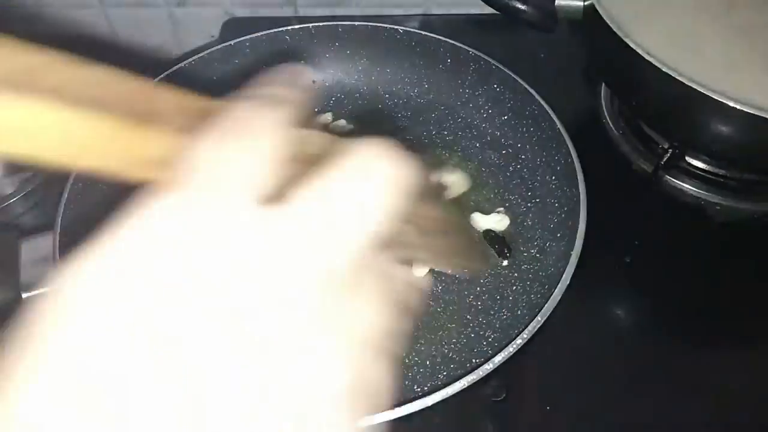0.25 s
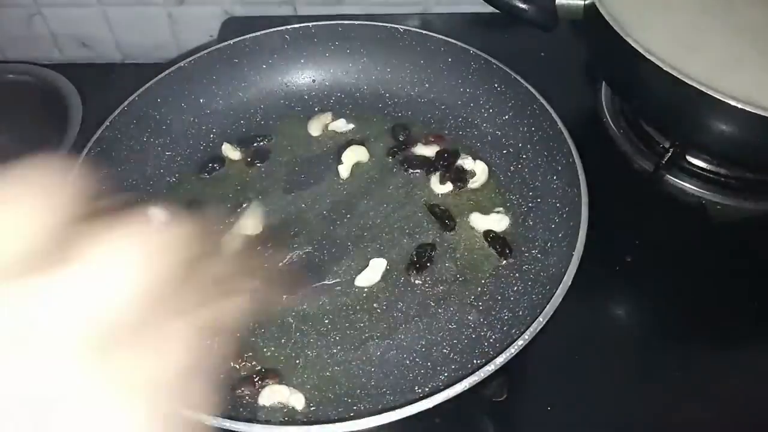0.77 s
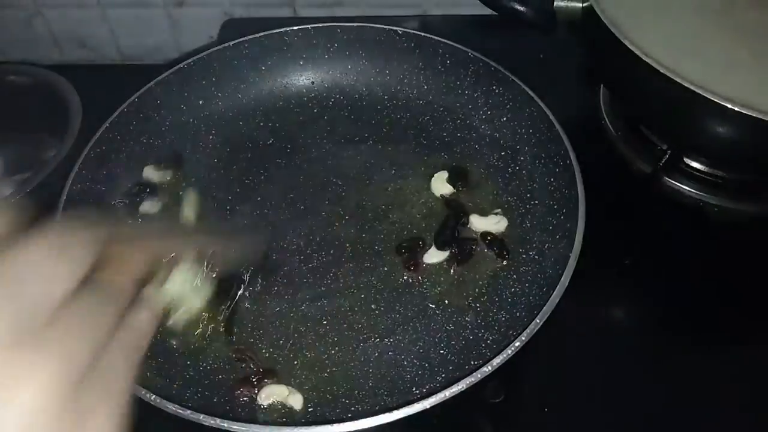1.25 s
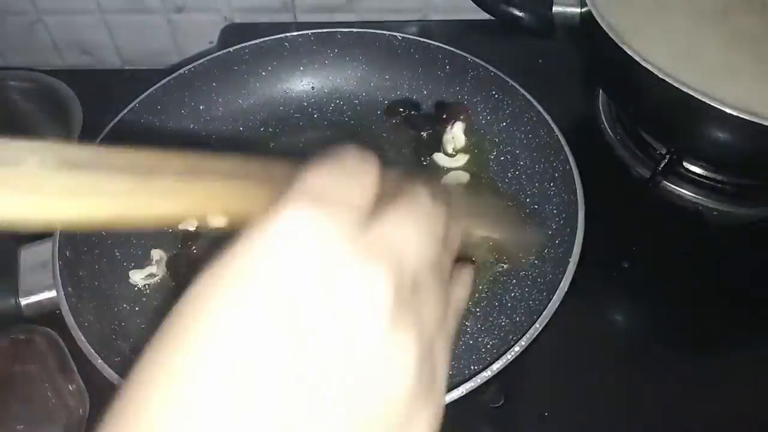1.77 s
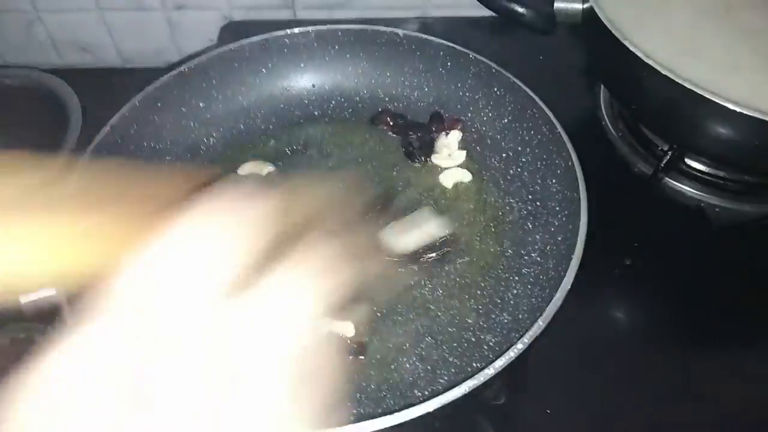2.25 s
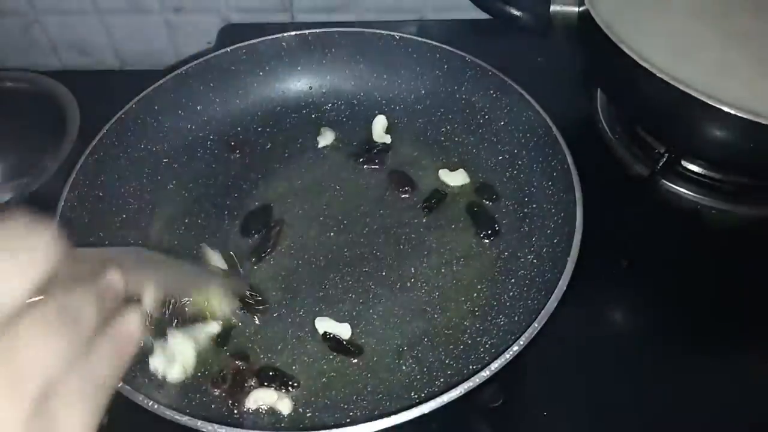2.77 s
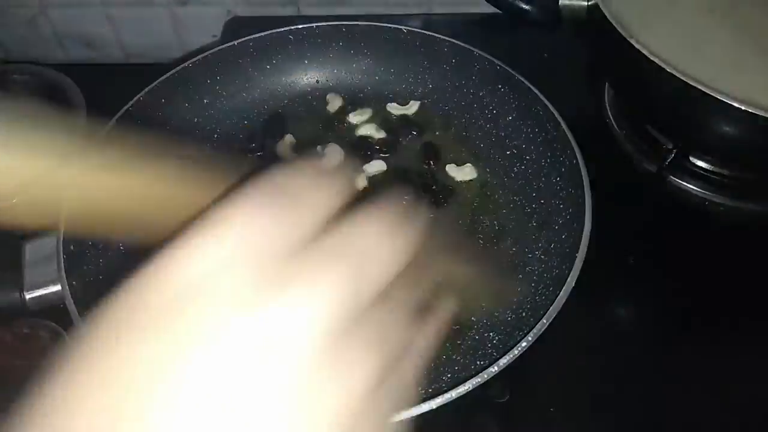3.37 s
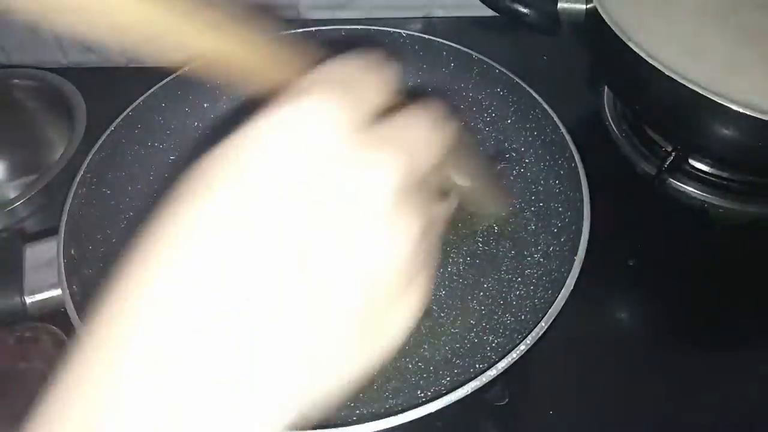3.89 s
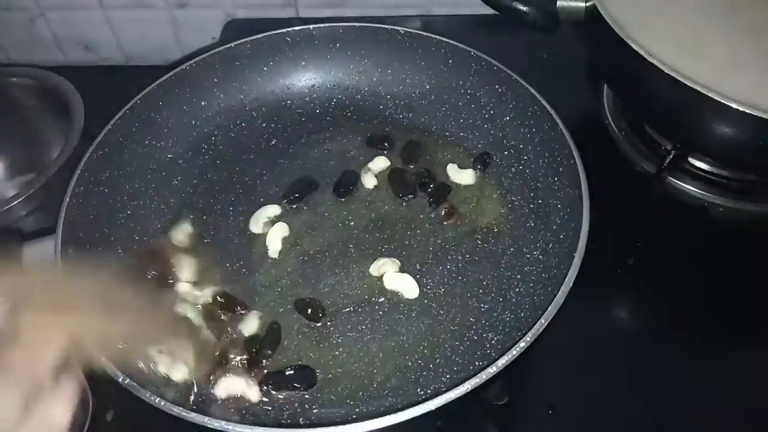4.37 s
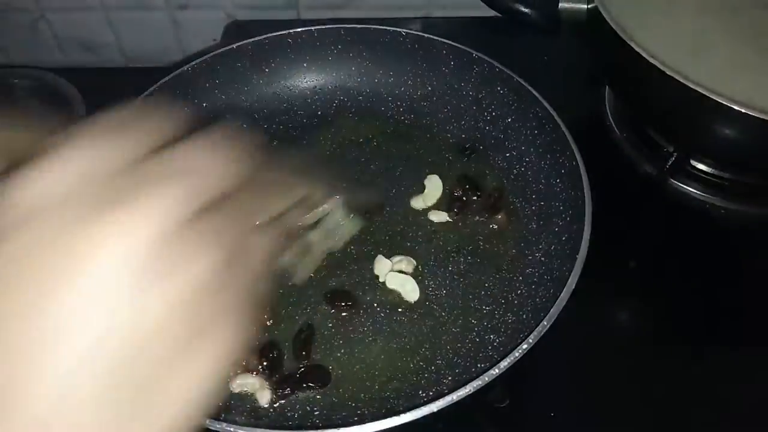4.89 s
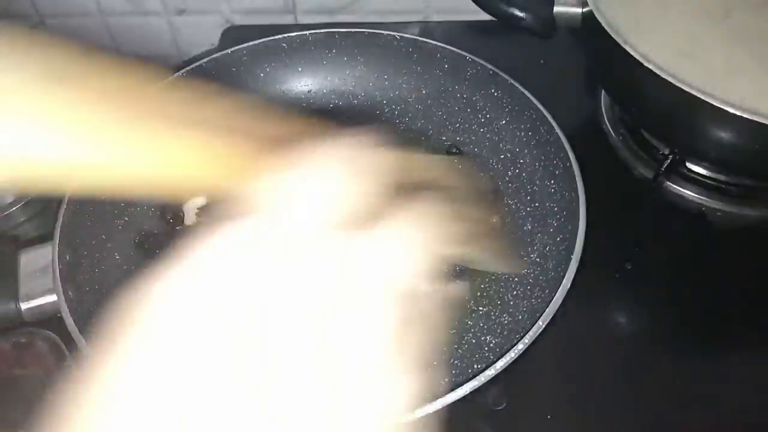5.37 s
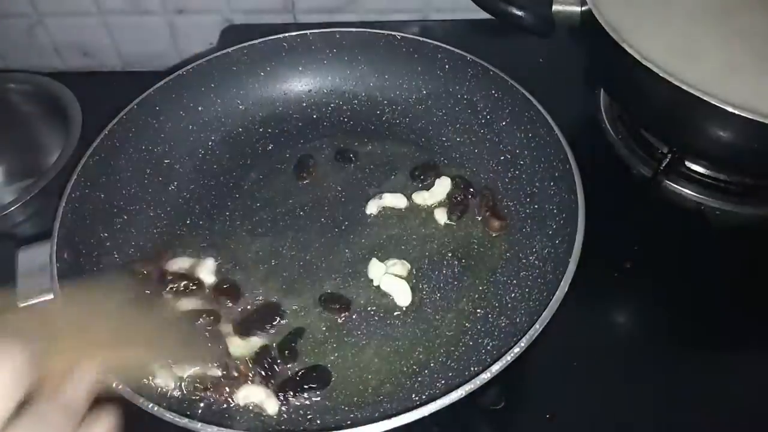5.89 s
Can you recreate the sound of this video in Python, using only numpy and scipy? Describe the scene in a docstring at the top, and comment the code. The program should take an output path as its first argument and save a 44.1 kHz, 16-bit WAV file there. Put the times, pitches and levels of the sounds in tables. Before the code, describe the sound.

A steady, bright sizzle of fine bubbles sits over a soft low rush and faint hum. Wood lands on the pan repeatedly, dull and hollow, then drags and rasps across the coating as nuts clatter lightly. Fat spits crackle most around two seconds, with another strong snap past four and a half. Close microphone, short kitchen reflections, same sound in both channels.

```python
"""Nuts sizzling in ghee

Cashews and raisins sizzle in a little hot ghee, close by in a small kitchen: noise and swarms of tiny
ringing bubbles, over a low simmer. A wooden spatula knocks on the pan at uneven intervals, ticks and
scrapes the nuts round, and sets the pan's dying vibrations ringing. Fat spits in short snaps and high
pings, and a few dull rumbles lie under the stirring. Both channels are alike."""
import sys
import numpy as np
from scipy import signal
from scipy.io import wavfile

SR = 44100
rng = np.random.default_rng(int(sys.argv[2]) if len(sys.argv) > 2 else 0)


def generate_wav(sig):
    """Save sig (samples, or channels by samples) to the path in sys.argv[1] as 16-bit PCM at SR."""
    pcm = np.round(np.clip(np.atleast_2d(sig).T, -1, 1) * 32767).astype(np.int16)
    wavfile.write(sys.argv[1], SR, pcm)


N = 270774
TIME = np.arange(N) / SR
RING_TIME = TIME[:SR]  # one second, enough for any ring to die away


def amp(db):
    """Turns decibels into a gain."""
    return 10 ** (np.asarray(db) / 20)


def evened(x):
    """Scales a sound to an average strength (rms) of 1."""
    return x / np.sqrt(np.mean(x ** 2) + 1e-20)


def read(points, hz):
    """Reads a (f/Hz, value) table, joining its points along a log-frequency axis."""
    f, value = np.transpose(points)
    return np.interp(np.log(hz + 1), np.log(f), value)


def add(mix, start_s, sound):
    """Mixes a sound in from the given time."""
    part = mix[max(round(start_s * SR), 0):][:len(sound)]
    part += sound[:len(part)]


def convolve(x, response):
    """Filters x and keeps its length."""
    return signal.fftconvolve(x, response)[:len(x)]


def colour(x, spectrum, size=4096):
    """Filters with the given spectrum, with no sound ahead of a click, so its front stays sharp."""
    hz = abs(np.fft.fftfreq(size, 1 / SR))
    log_gain = np.log(amp(read(spectrum, hz)))
    minimum_phase = np.exp(np.conj(signal.hilbert(log_gain)))
    response = np.fft.ifft(minimum_phase).real[:size // 2]
    return convolve(x, response)


def clicks(count, per_s, spread_db):
    """Makes a random train of clicks, most small and a few large."""
    sizes = amp(spread_db * np.minimum(rng.exponential(1, count), 6))
    signs = rng.choice([-1, 1], count)
    happens = rng.random(count) < per_s / SR
    return evened(sizes * signs * happens)


def flutter(count, per_s, depth_db):
    """Makes a gain that wanders at random, heading for per_s new levels each second."""
    steps = np.arange(count) * per_s / SR
    return amp(depth_db * np.interp(steps, np.arange(4096), rng.standard_normal(4096)))


def bump(length_s):
    """Makes a smooth push that rises and falls, length_s long at half height."""
    return signal.windows.hann(round(2 * length_s * SR))


def swell(rise_s, t60_s):
    """Makes an envelope that builds up, then dies away by 60 dB in t60_s."""
    return (1 - np.exp(-RING_TIME / rise_s)) * np.exp(-np.log(1000) * RING_TIME / t60_s)


def mode(hz, rise_s, t60_s):
    """Makes one dying vibration: a sine under a swell."""
    return swell(rise_s, t60_s) * np.sin(2 * np.pi * hz * RING_TIME)


def soften(x, hz):
    """Dulls a blow: a soft contact passes little above its corner frequency."""
    return signal.lfilter(*signal.butter(2, min(hz, SR / 4), fs=SR), x)


# how long the room's echo takes to die by 60 dB: (f/Hz, t60/s)
ROOM_ECHO = [(200, 0.56), (1000, 0.47), (4000, 0.085), (12000, 0.029)]


def kitchen(x, wet_db):
    """Adds the tiled room: dense reflections, the treble dying first."""
    hz, t, cells = signal.stft(rng.standard_normal(SR // 2), SR, nperseg=256)
    fade = amp(-60 * t / read(ROOM_ECHO, hz)[:, None])
    tail = signal.istft(cells * fade, SR, nperseg=256)[1]
    tail[:round(.005 * SR)] = 0  # the first reflections arrive after 5 ms
    return x + amp(wet_db) * convolve(x, tail / np.linalg.norm(tail))


# the spatula turns moist nuts onto hot metal: (t/s, length/s, flare level/dB)
TURNING_NUTS = [(-0.013, 0.16, 2.5), (.39, 0.5, 1.5), (1.027, 0.61, 2.5), (1.68, 0.33, 2.5),
                (2.18, 0.11, 4.5), (2.484, 0.3, 2.5), (2.976, 0.18, 1.5), (3.28, 0.44, 2),
                (3.726, 0.9, 2.5), (4.856, .46, 1.3), (5.59, 0.27, 2.5), (5.944, 0.3, 2.5)]
FLARE_RISE_S, FLARE_FALL_S = 0.045, 0.076
STROKE_FLARE_DB = 2.14  # extra sizzle at the hardest push of the loudest rasp


def flare_db():
    """Each turn lifts the sizzle quickly, holds it and lets it settle; a rasping stroke adds a surge."""
    flare = np.zeros(N)
    for s, length, db in TURNING_NUTS:
        rise = 1 - np.exp(-np.maximum(TIME - s, 0) / FLARE_RISE_S)
        fall = np.exp(-np.maximum(TIME - s - length, 0) / FLARE_FALL_S)
        flare += db * rise * fall
    hardest_db = max(row[2] for row in SPATULA_STROKES)
    for s, length, rasp_db, _, _ in SPATULA_STROKES:
        add(flare, s - length, STROKE_FLARE_DB * amp(rasp_db - hardest_db) * bump(length))
    return flare


def bubble_swarm():
    """Each bubble rings for a few cycles at a pitch set by its size; each size has its own flurries."""
    swarm = np.zeros(N)
    for hz in np.geomspace(1300, 15000, 24):
        cycles = hz * TIME[:256]
        ring = np.sin(2 * np.pi * cycles) * np.exp(-cycles / 1.6)
        bursts = clicks(N, per_s=max(hz * .1, 450), spread_db=1.0)
        bursts = bursts * flutter(N, per_s=35, depth_db=3.0)
        swarm += np.sqrt(hz) * evened(np.convolve(bursts, ring)[:N])
    return evened(swarm)


# tone filter for the bursting bubbles: (f/Hz, relative level/dB)
SIZZLE_TONE = [(500, -41), (1200, -17), (2000, -15), (2650, -14.5), (3200, -15.5), (3900, -8), (4800, -5.5),
               (5550, 0.5), (6500, -2.5), (7200, -15), (8000, -26), (10000, -47), (16000, -75)]
# tone filter for the finest fizz: (f/Hz, relative level/dB)
FIZZ_TONE = [(5000, -33), (8000, -5), (9000, -3), (10700, -10.5), (12700, -1.5), (13700, -14), (15100, 9),
             (15800, -4.5)]
# the ghee left to itself, slowly getting hotter, before flares: (t/s, sizzle level/dB, fizz level/dB)
RESTING_GHEE = [(0, -29, -54), (1.3, -28, -51.5), (2.2, -29, -53.5), (3.7, -27.5, -49), (6.1, -26.5, -48)]
FIZZ_FOLLOWS = 1.27  # dB of fizz per dB of flare


def sizzle():
    """Thousands of steam bubbles burst each second, louder where nuts are turned onto hot metal."""
    s, sizzle_db, fizz_db = np.transpose(RESTING_GHEE)
    flare = flare_db()
    bubbles = bubble_swarm() + 0.58 * rng.standard_normal(N)  # the smallest merge into a hiss
    body = evened(colour(bubbles, SIZZLE_TONE)) * flutter(N, per_s=16, depth_db=.5)
    body = body * amp(np.interp(TIME, s, sizzle_db) + flare)
    fine = evened(colour(bubbles, FIZZ_TONE)) * flutter(N, per_s=63, depth_db=2.5)
    fine = fine * amp(np.interp(TIME, s, fizz_db) + FIZZ_FOLLOWS * flare)
    return body + fine


# tone of the low simmer: (f/Hz, relative level/dB)
SIMMER_TONE = [(25, -43), (80, -39), (140, -28.5), (210, -21.5), (260, -19), (305, 2.5), (360, -4),
               (410, -0.5), (470, -4.5), (570, -2.5), (660, -12), (830, -5), (1200, -13.5), (3000, -32)]
SIMMER_DB, HUM_DB = -38, -50  # the simmer before any flare, and the steady hum
SIMMER_FOLLOWS = 0.18  # dB of simmer per dB of flare
BASE_HZ, BASE_T60_S = 310.2, 0.6  # the whole base flexing like a drum skin


def simmer():
    """A low, uneven rush from the stove and the bubbling fat, with the pan's base humming along."""
    rush = evened(colour(rng.standard_normal(N), SIMMER_TONE)) * flutter(N, per_s=22, depth_db=0.5)
    hum = evened(convolve(rng.standard_normal(N), mode(BASE_HZ, 0.0028, BASE_T60_S)))
    return amp(SIMMER_DB + SIMMER_FOLLOWS * flare_db()) * rush + amp(HUM_DB) * hum


# many short, crowded resonances of pan, spatula and stove: (f/Hz, relative level/dB)
CLATTER_TONE = [(60, -35), (150, -23.5), (260, -0.5), (420, 1.5), (500, -5.5), (650, 5), (800, -14),
                (1000, -1), (1350, 2), (1700, -1), (2500, -3.5), (5000, -4.5), (9000, -21)]
TICKS_PER_S, TICKS_DB = 45, -47.5  # average rate, and average level of the whole layer
TICKS_FOLLOW = 1.1  # dB of ticks per dB of flare


def tumbling():
    """Nuts tick against the pan and each other, louder while they are being turned."""
    ticks = clicks(N, per_s=TICKS_PER_S, spread_db=2.2) * amp(TICKS_FOLLOW * flare_db())
    clattering = kitchen(colour(ticks, CLATTER_TONE), wet_db=2)
    return amp(TICKS_DB) * evened(clattering)


# the pan's own vibrations: (f/Hz, relative level/dB, t60/s when left free)
PAN_MODES = [(268, -21, 0.31), (409.4, -20.5, 0.44), (541, -14.5, 0.22), (628, -7.5, .26), (662, -9.5, .17),
             (715, 0, .19), (780, -18, 0.43), (878, -11, 0.18), (933, -7, 0.13), (1053, -15, .12),
             (1154, -12, 0.093), (1217, -14, 0.2), (1288, -16.5, 0.3), (1345, -11.5, 0.28),
             (1414, -25, 0.15), (1466, -19.5, 0.55), (1530, -28, 0.24), (1720, -34, .22),
             (1995, -20.5, 0.42), (2145, -19, 0.12), (2500, -35, 0.17)]


def pan_ring(scatter_db=0, ring_share=1):
    """The pan answers one sharp tap with many dying vibrations, their levels scattered at random."""
    ring = np.zeros(SR)
    for hz, db, t60 in PAN_MODES:
        level = amp(db + scatter_db * rng.uniform(-0.89, 1))
        ring += level * mode(hz, 0.0018, t60 * ring_share)
    return ring


# spatula knocks and rebounds, levels before softening and flutter:
# (t/s, pan ring level/dB, base boom level/dB, wooden thud level/dB, thud f/Hz, thud t60/s,
#  clatter level/dB, hardness of the contact as a corner f/Hz)
SPATULA_KNOCKS = [(0.0183, -26.5, -27.5, -19.5, 910, 0.12, -35, 2800),
                  (.418, -11.5, -15, -16, 806, 0.082, -20, 1300),
                  (.700, -28.5, -26.5, -23, 890, 0.074, -38, 1200),
                  (1.0512, -16, -22.5, -4.5, 712, 0.15, -13, 860),
                  (1.7946, -12, -18.5, -7, 712, 0.21, -13, 1320),
                  (2.160, -28.5, -23.5, -23, 907, 0.12, -27.5, 1300),
                  (2.2453, -16, -15.5, -7.5, 703, 0.072, -14, 2330),
                  (2.285, -27, -40, -22, 710, 0.043, -24, 1900),
                  (2.972, -26.5, -18, -25, 874, 0.24, -22, 2800),
                  (3.3358, -13, -18.5, -8.5, 712, 0.13, -14.5, 1300),
                  (3.981, -11, -19, 3, 700, 0.06, -12.5, 1100),
                  (5.4660, -14, -18.5, -12, 708, 0.17, -15, 1500)]
# bright clacks where the spatula's thin edge meets the metal: (t/s, level/dB, f/Hz, t60/s)
EDGE_CLACKS = [(.016, -25.5, 1680, .05), (.0175, -24.5, 2580, .03), (1.795, -15.5, 1037, .05),
               (2.2446, -19, 1580, .06), (2.2448, -10, 1385, .055), (2.245, -14.5, 930, .08),
               (2.2452, -21, 2170, .06), (2.972, -22, 2560, .035), (2.973, -28.5, 1690, .13),
               (2.975, -29.5, 1510, .17)]
# the dragged spatula judders and keeps one of the pan's modes singing, levels before flutter:
# (t/s of the peak, length/s at half height, level/dB, f/Hz)
SPATULA_JUDDERS = [(0.171, .03, -21.5, 733), (0.563, .04, -24, 313), (1.215, .08, -34, 311.6),
                   (2.301, 0.026, -16.5, 724), (3.025, 0.0254, -19, 307), (3.533, 0.039, -30, 723),
                   (5.664, .02, -33, 708)]
RING_SCATTER_DB = 3  # each knock lands somewhere else and favours other modes


def knocks():
    """Wood lands on the pan: a hollow thud, short clatter, the pan's ring and its base's slower boom."""
    blows, thuds, booms = np.zeros((3, N))
    clatter_fade = swell(.0006, .1) + amp(-13) * swell(.01, .28)
    for s, ring_db, boom_db, thud_db, thud_hz, thud_t60, clatter_db, hard_hz in SPATULA_KNOCKS:
        ring = amp(ring_db) * pan_ring(RING_SCATTER_DB)
        clatter = evened(colour(rng.standard_normal(SR), CLATTER_TONE)) * clatter_fade
        add(blows, s, soften(ring + amp(clatter_db) * clatter, hard_hz))
        add(thuds, s, amp(thud_db) * mode(thud_hz, .005, thud_t60))
        add(booms, s, amp(boom_db) * mode(BASE_HZ, 0.024, BASE_T60_S))
    for s, db, hz, t60 in EDGE_CLACKS:
        add(blows, s, amp(db) * mode(hz, 0.00051, t60))
    for s, length, db, hz in SPATULA_JUDDERS:
        push = bump(length)
        add(booms, s - length, amp(db) * push * np.sin(2 * np.pi * hz * TIME[:len(push)]))
    # the wood presses unevenly on the pan
    thuds = thuds * flutter(N, per_s=130, depth_db=2.0)
    booms = booms * flutter(N, per_s=55, depth_db=2)
    return kitchen(blows, wet_db=-14) + thuds + booms


# spatula strokes, levels for even pushing:
# (t/s of the hardest push, length/s at half height, rasp level/dB, pan ring level/dB, rasp centre f/Hz)
SPATULA_STROKES = [(0.14, 0.05, -40, -27, 1520), (0.175, 0.02, -57, -25.5, 900),
                   (0.523, .12, -38, -45, 1200), (1.267, .06, -31, -54, 3000), (2.208, .07, -57, -37, 1000),
                   (3.419, 0.083, -37, -31.5, 1880), (3.507, 0.072, -33, -35.5, 1470),
                   (3.612, 0.054, -41, -55, 2500), (4.14, .13, -35.5, -33, 1500),
                   (4.279, 0.069, -38, -34, 1720), (4.951, 0.11, -38, -57, 2620),
                   (5.66, 0.068, -33, -28.5, 1470), (5.728, 0.063, -33, -32, 2000)]
PRESSED_RING = 0.52  # share of the pan's ring time left while the spatula presses on it


def scrapes():
    """The spatula's edge sticks and slips over the coating, rasping and setting the pan ringing."""
    out = np.zeros(N)
    base = mode(BASE_HZ, 0.004, BASE_T60_S * PRESSED_RING)
    ring = pan_ring(ring_share=PRESSED_RING) + amp(-14.5) * base
    for s, length, rasp_db, ring_db, rasp_hz in SPATULA_STROKES:
        push = bump(length)
        slips = push * clicks(len(push), per_s=1500, spread_db=2.0)
        slips = np.pad(slips, (0, SR // 2))  # room for the ring to die away
        band_hz = [rasp_hz / 1.74, min(rasp_hz * 1.42, SR / 3)]
        rasp = signal.lfilter(*signal.butter(2, band_hz, "band", fs=SR), signal.unit_impulse(512))
        response = amp(ring_db) * ring / np.linalg.norm(ring)
        add(response, 0, amp(rasp_db) * rasp / np.linalg.norm(rasp))
        add(out, s - length, convolve(slips, response))
    return out


# drops of fat spitting: (t/s just before the snap, level/dB that snap and echo are set from)
FAT_SPITS = [(0.5115, -13.5), (0.7433, -25), (1.046, -18), (1.574, -13.5), (1.747, -20), (1.798, -9),
             (1.9016, -14), (1.953, -21), (1.9577, -2), (2.2443, -13), (3.2181, -11.5), (4.6279, -5.5),
             (5.9425, -14)]
# tone of a spitting drop's snap: (f/Hz, relative level/dB)
SNAP_TONE = [(500, -70), (2000, -41), (3200, -21), (3900, -1.5), (5300, 4), (6500, 3.5), (7400, -13.5),
             (9000, -22.5), (16000, -39)]
# tiny bubbles that burst with a high ping: (t/s, peak level/dB before the room, f/Hz, t60/s)
BUBBLE_PINGS = [(1.047, -29, 9950, 0.02), (1.1125, -25, 14200, .012), (1.3987, -11, 14600, 0.0084),
                (1.399, -25, 7900, .015), (1.9588, -22, 14900, .008), (2.953, -30, 15300, .012),
                (4.7227, -32, 9960, .006)]


def spits():
    """Water trapped in the fat bursts with a snap, echoed by the pan's wall; tiny bubbles ping."""
    out = np.zeros(N)
    snap = colour(signal.unit_impulse(1024), SNAP_TONE)
    snap /= abs(snap).max()
    for s, db in FAT_SPITS:
        add(out, s + .001, amp(db + 4.0) * snap)
        add(out, s + .0031, amp(db - 3) * snap)  # the echo
    for s, db, hz, t60 in BUBBLE_PINGS:
        burst = mode(hz, .0001, t60) * flutter(SR, per_s=1500, depth_db=7)
        add(out, s, amp(db) * burst / abs(burst).max())
    return kitchen(out, wet_db=-3)


# dull low rumbles under the stirring: (t/s of the peak, length/s at half height, level/dB)
STIRRING_RUMBLES = [(3.96, .04, -48), (4.873, 0.12, -53), (5.492, .05, -44), (5.652, 0.16, -58)]
# tone of the rumbles: (f/Hz, relative level/dB)
RUMBLE_TONE = [(25, -34), (70, -17), (130, -11), (215, 5), (260, -3), (400, -22)]


def rumbles():
    """Low noise swells softly and fades."""
    push = np.zeros(N)
    for s, length, db in STIRRING_RUMBLES:
        add(push, s - length, amp(db) * bump(length))
    return push * evened(colour(rng.standard_normal(N), RUMBLE_TONE))


def scene():
    """Mixes all the layers, alike in both channels; a bass cut keeps the spatula sounds light."""
    bass_cut = signal.butter(2, 190, "high", fs=SR, output="sos")
    spatula = signal.sosfilt(bass_cut, tumbling() + knocks() + scrapes())
    return np.tile(sizzle() + simmer() + spatula + spits() + rumbles(), (2, 1))


EDGE_HZ = 15850  # little treble passes above this


def record(dry):
    """Flattens the loudest peaks, then cuts off the highest treble."""
    limited = np.clip(dry, -.95, .95)
    treble_cut = signal.firwin(511, EDGE_HZ, window=("kaiser", 9), fs=SR)
    return signal.oaconvolve(limited, treble_cut[None], "same")


dry = scene()
out = record(dry)
generate_wav(out)
```